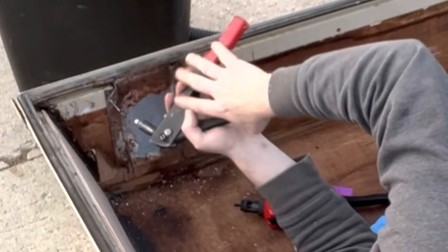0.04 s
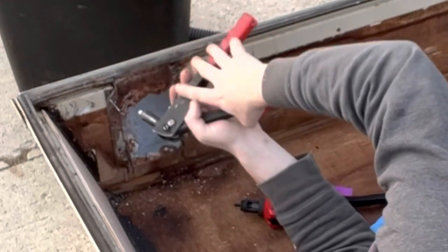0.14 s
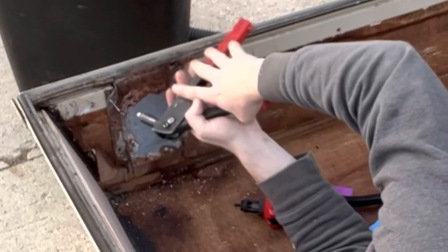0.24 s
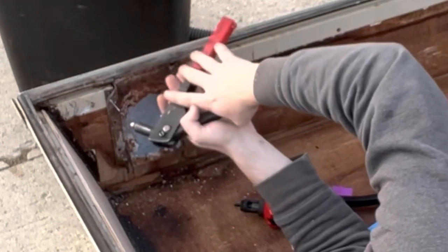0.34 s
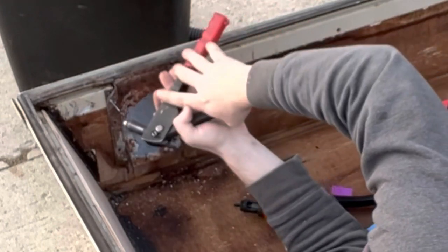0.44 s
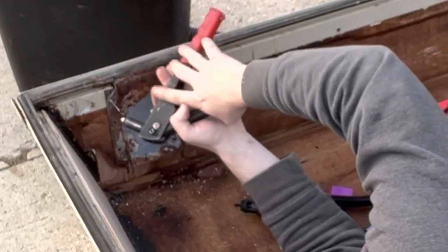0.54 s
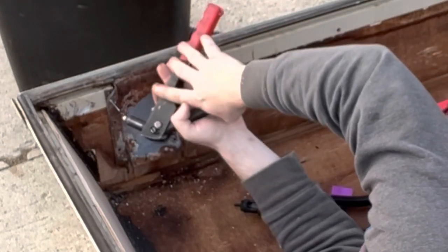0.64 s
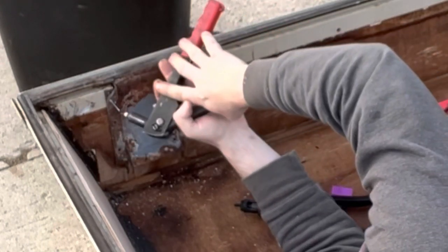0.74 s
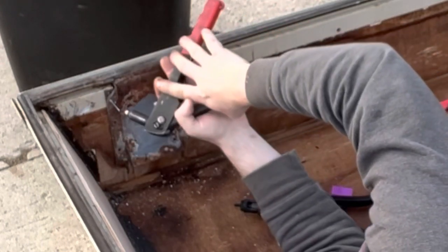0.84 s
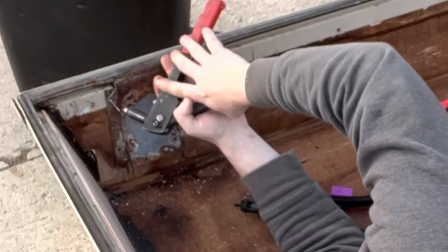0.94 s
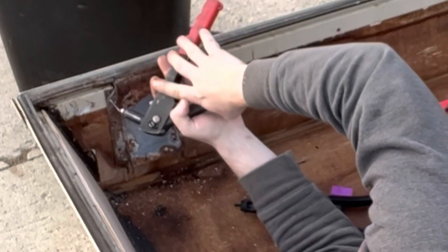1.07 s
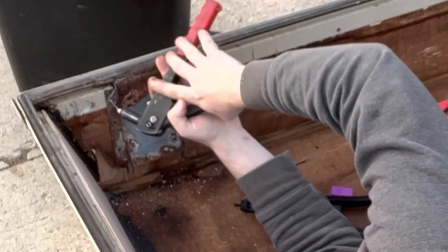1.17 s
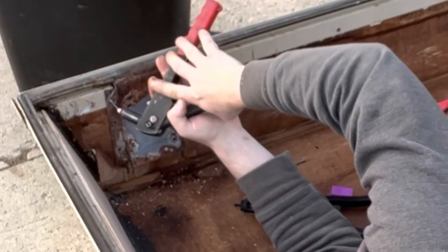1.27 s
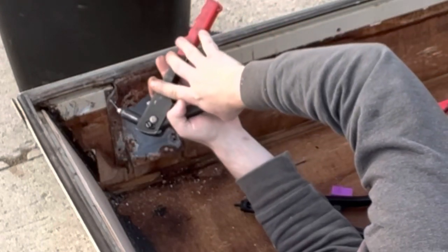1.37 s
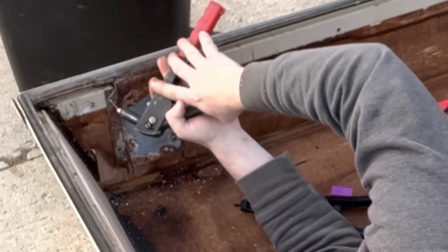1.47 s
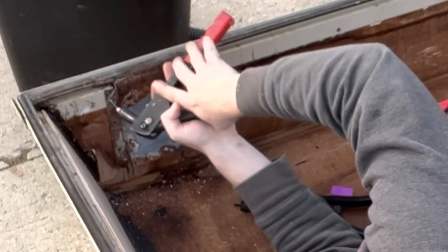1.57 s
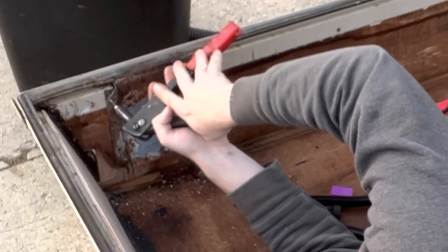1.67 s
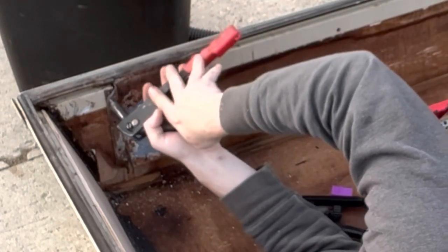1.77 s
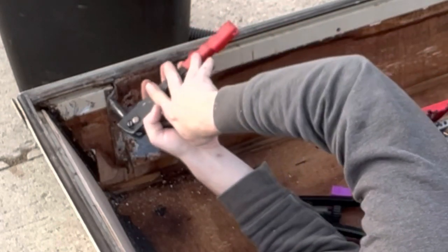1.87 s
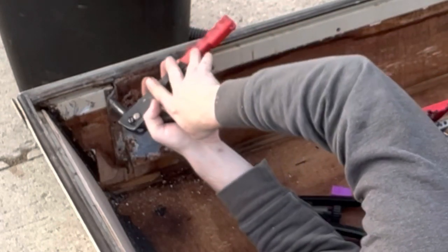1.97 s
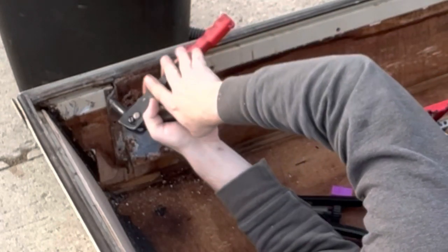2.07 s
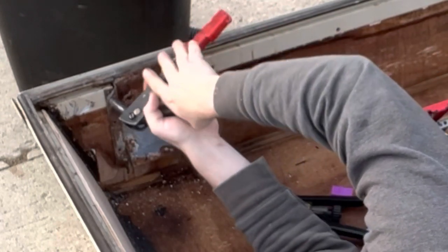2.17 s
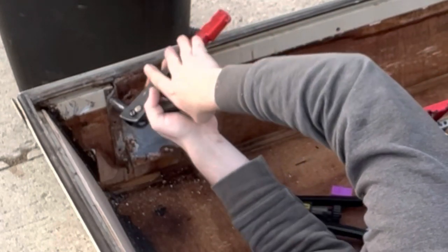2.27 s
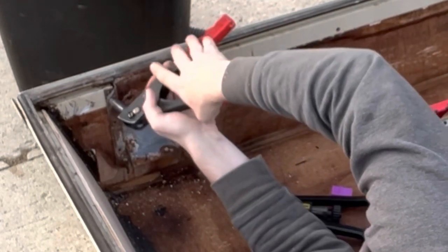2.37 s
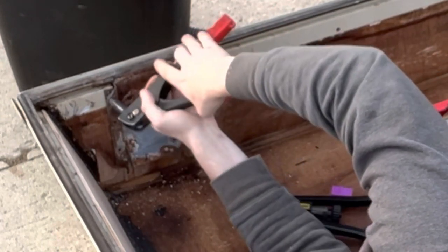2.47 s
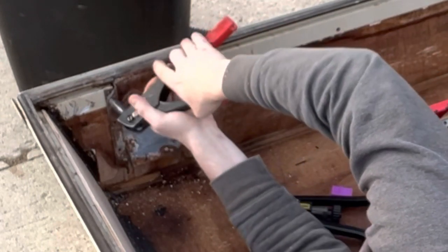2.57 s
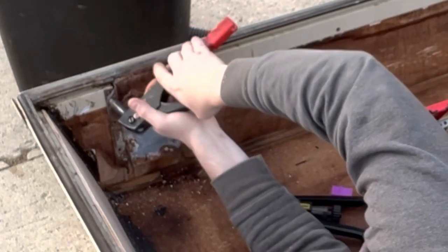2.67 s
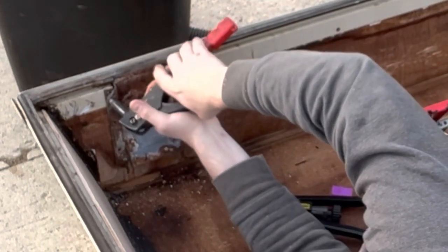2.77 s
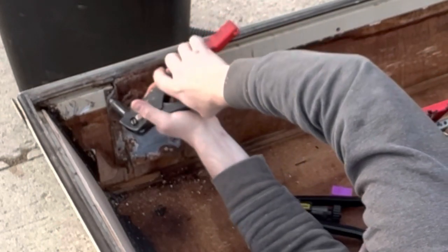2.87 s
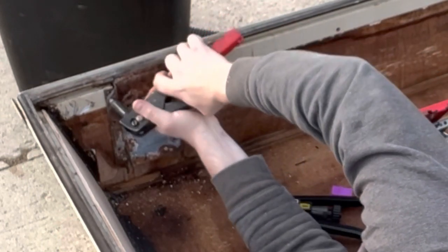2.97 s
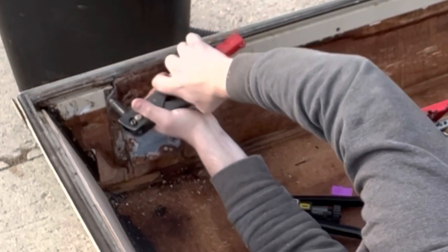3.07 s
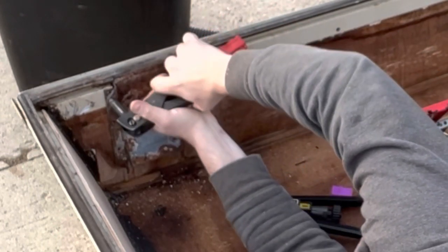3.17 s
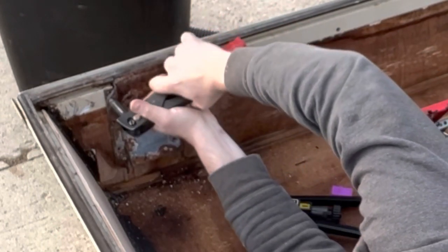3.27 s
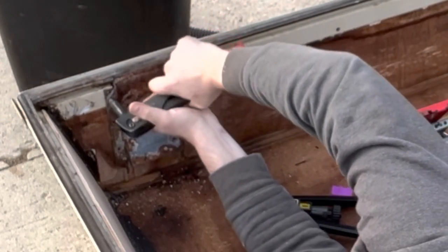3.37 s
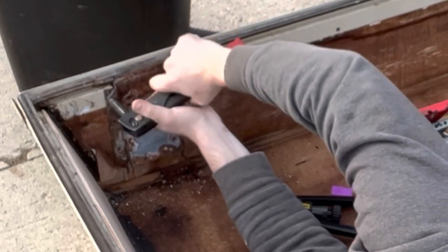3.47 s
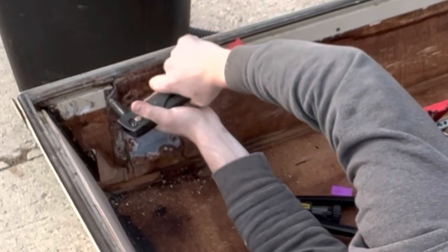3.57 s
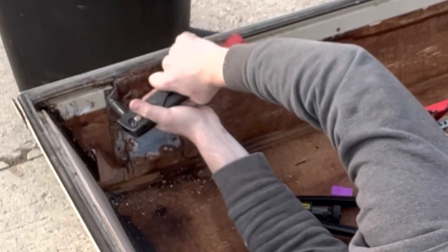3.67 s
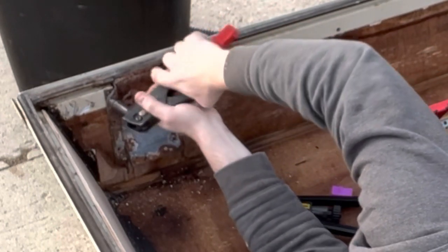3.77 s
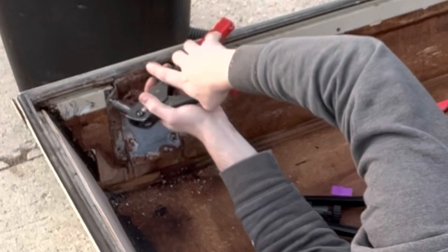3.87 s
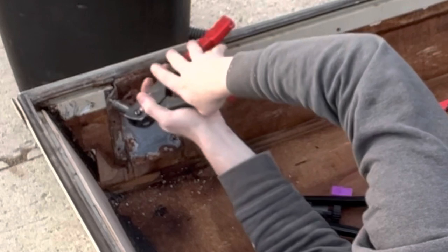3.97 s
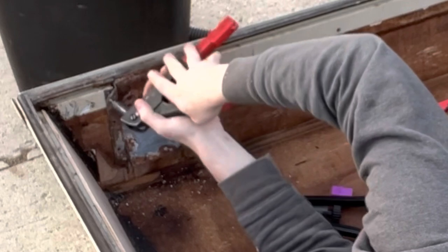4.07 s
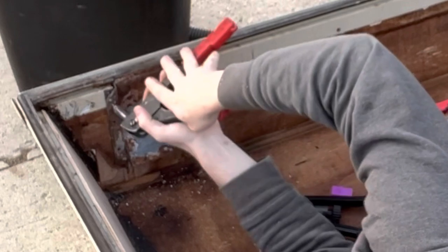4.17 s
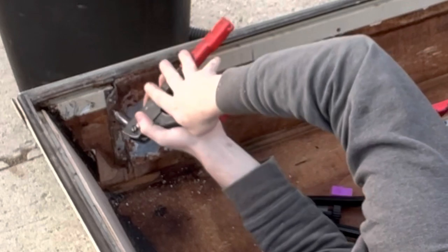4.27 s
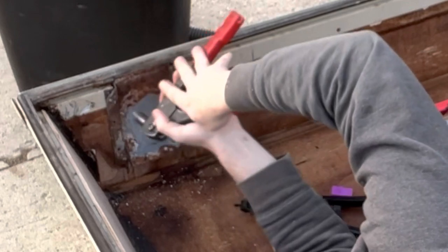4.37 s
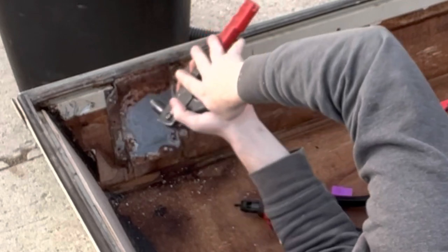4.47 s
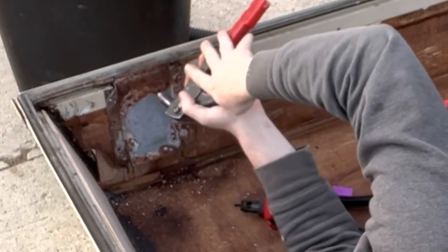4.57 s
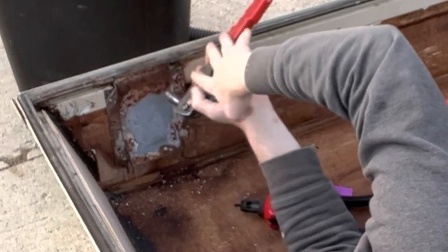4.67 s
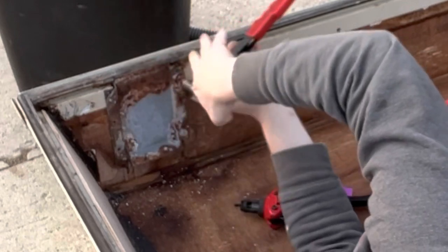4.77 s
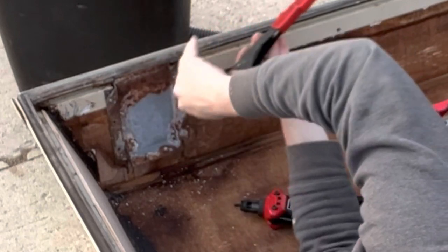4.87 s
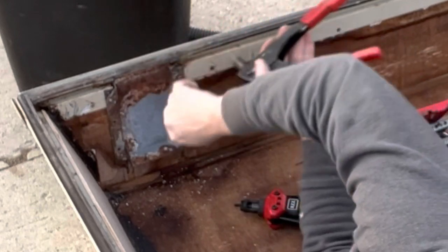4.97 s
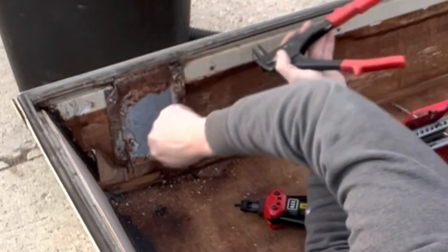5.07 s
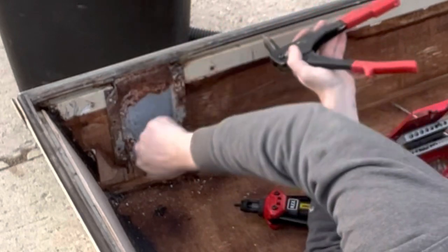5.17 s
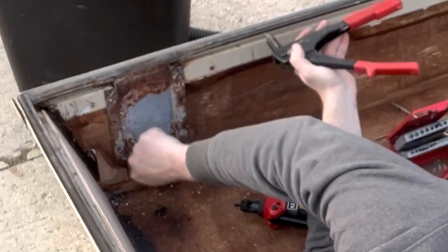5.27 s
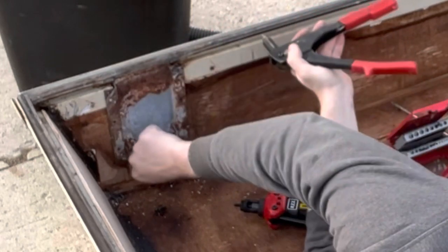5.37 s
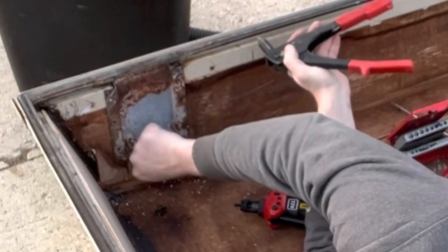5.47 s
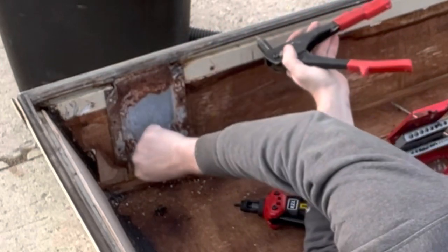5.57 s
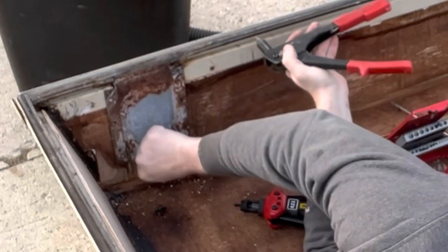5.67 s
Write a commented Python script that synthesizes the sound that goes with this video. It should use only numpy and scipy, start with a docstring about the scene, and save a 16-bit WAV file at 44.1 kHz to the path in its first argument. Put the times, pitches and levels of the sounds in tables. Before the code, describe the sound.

Faint clicks and sleeve rustle lead to one loud metallic snap as a hand riveter breaks the pin, then small rattles outdoors.

```python
"""Outdoors in a walled yard, a hand riveter sets a pop rivet in a steel patch on a wood-lined metal frame.
The mandrel breaks with a loud snap and the tool recoils onto the panel: decaying partials over dense noise.
Before and after, small contacts tick, grind, ping and rub, and a sleeve hisses as grained, fluttering noise.
Walls return smeared echoes and a dull tail; behind them lie traffic rumble, air hiss and one faint whistle."""
import sys
import numpy as np
from scipy import signal
from scipy.fft import rfft, irfft, next_fast_len
from scipy.io import wavfile
from scipy.ndimage import uniform_filter1d

SR = 44100
rng = np.random.default_rng(int(sys.argv[2]) if len(sys.argv) > 2 else 0)


def file_out(sig):
    """Save sig as 16-bit WAV at sys.argv[1]."""
    # one column per channel
    cols = np.atleast_2d(sig).T
    # limit, then scale
    lim = np.clip(cols, -1, 1)
    pcm = np.round(lim * 32767).astype(np.int16)
    wavfile.write(sys.argv[1], SR, pcm)


N = 252693
T = np.arange(N) / SR   # time in s

# the mandrel breaks, the jaws slam back and bounce twice:
# (t/s, level/dB, thud/dB, treble edge f/Hz, contact length/s)
SNAP = [(3.3722, -8, -16, 15900, 0.003), (3.3738, -10.5, -4.5, 5394, 0.0013),
        (3.3772, -17.5, 1.5, 9570, .003), (3.3885, -24, 1.5, 4000, 0.0024)]
# the tool lands on the panel with a low thud and rocks to rest:
# (t/s, level/dB, thud/dB, treble edge f/Hz, contact length/s)
LANDINGS = [(3.3885, -19.5, 8, 560, 0.018), (3.402, -25, 5.5, 260, 0.012), (3.422, -32.5, 5.5, 332, 0.008),
            (3.447, -34.5, 6, 393, 0.008)]
# the tool knocks against the plate as it is seated and as it rattles free:
# (t/s, level/dB, thud/dB, treble edge f/Hz, ping f/Hz, ping level/dB)
KNOCKS = [(1.177, -60, -10, 4700, 1420, -63), (1.184, -49, -2, 4650, 1400, -71),
          (1.188, -52.5, 6.5, 4600, 3440, -61), (1.198, -59, 14, 4740, 5160, -52),
          (1.203, -55.5, 4, 4670, 1400, -48), (1.829, -47, 7, 6500, 3060, -50.5),
          (1.8931, -50.5, 15.5, 1780, 403, -41.5), (2.040, -42, 7.5, 1900, 2310, -53),
          (3.7398, -55, 9.5, 6480, 1500, -59), (3.746, -56.5, 13, 2200, 991, -55.5),
          (3.7595, -41, 11, 5200, 4530, -43.5), (3.7715, -48, 11.5, 9100, 2940, -43),
          (3.780, -51, 8.5, 4200, 1010, -47), (3.8204, -45, 14, 4430, 395, -44.5),
          (3.844, -51, 6, 6340, 4100, -52), (3.868, -47.5, 11, 4400, 2900, -67),
          (3.910, -45, -2, 2840, 1430, -38.5), (3.955, -59, 5.5, 3470, 1448, -56.5),
          (3.969, -54, 12, 5000, 4160, -53.5), (3.981, -62.5, 20.5, 2000, 360, -52.5),
          (4.209, -56, -4, 2400, 2360, -67.5)]
KNOCK_S = 0.0035   # how long a knock stays in contact
# left-right likeness of near sound: (f/Hz, likeness 0-1)
NEAR_LIKENESS = [(250, 0.69), (1000, 0.76), (2000, 0.61), (10000, 0.75)]
# left-right likeness of distant sound: (f/Hz, likeness 0-1)
FAR_LIKENESS = [(60, 1), (250, 0.48), (800, 0.23), (2000, 0.17), (10000, 0.13)]
EDGE_ORDER = 3.5   # steepness of the treble and bass edges of a contact


def from_db(db):
    """Decibels to gain."""
    return 10 ** (np.asarray(db) / 20)


def rms_one(x):
    """Scale to an rms of one."""
    return x / np.sqrt(np.mean(x ** 2) + 1e-20)


def at_hz(points, hz):
    """Read a table on a log-frequency axis."""
    f, value = np.transpose(points)
    return np.interp(np.log(np.maximum(hz, 1)), np.log(f), value)


def noise(spectrum, likeness):
    """Stereo noise of a given colour and left-right likeness; rms 1."""
    size = next_fast_len(N)
    hz = np.arange(size // 2 + 1) * SR / size
    alike = np.clip(at_hz(likeness, hz), 0, 1)
    mid, side = rfft(rng.standard_normal((2, size)))
    pair = np.sqrt(1 + alike) * mid + np.sqrt(1 - alike) * side * [[1], [-1]]
    # the colour fades beyond both ends of its table
    bass_end = np.clip(hz / spectrum[0][0], 0, 1) ** 2
    treble_end = 1 / np.maximum(hz / spectrum[-1][0], 1) ** 4
    colour = bass_end * treble_end * from_db(at_hz(spectrum, hz))
    return rms_one(irfft(pair * colour, size)[:, :N])


def bands(x):
    """Split into third octaves: (centre Hz, band)."""
    edges = 56 * 2 ** (np.arange(26) / 3)
    for low, high in zip(edges, edges[1:]):
        sos = signal.butter(2, [low, high], "band", fs=SR, output="sos")
        yield np.sqrt(low * high), signal.sosfilt(sos, x)


def ring(clicks, hz, t60):
    """A two-pole resonator: a unit click sets a sine of height 1 ringing, which then dies."""
    r, w = from_db(-60 / (t60 * SR)), 2 * np.pi * hz / SR
    return signal.lfilter([0, np.sin(w)], [1, -2 * r * np.cos(w), r * r], clicks + 1e-18)


def linger(energy, t60):
    """Spread energy into a dying tail, keeping its total."""
    r = from_db(-60 / (t60 * SR)) ** 2
    return signal.lfilter([1 - r], [1, -r], energy + 1e-18)


def grained(sound, grain_db):
    """Tiny slips, a millisecond or two each, roughen a sound."""
    grain = rms_one(uniform_filter1d(rng.standard_normal(N), size=70))
    return rms_one(sound * from_db(grain_db * grain))


def strength(rows, hz):
    """How hard each contact drives a frequency: weight on the panel adds thud, a soft contact lacks treble."""
    s, level_db, thud_db, edge_hz, length = np.transpose(rows)
    thud_share = at_hz([(420, 0.94), (1100, 0.088)], hz)
    return from_db(level_db + thud_share * thud_db) / np.hypot(1, (hz / edge_hz) ** EDGE_ORDER)


def above(hz, edge_hz):
    """Steel striking steel is too light to move the panel: its bass falls away below an edge."""
    return 1 / np.hypot(1, (edge_hz / hz) ** EDGE_ORDER)


def partials(rows, column, vary_db, bass_hz):
    """Every contact starts the same dying partials, each with strengths of its own; slow scuffs hardly do."""
    # the pitched partials heard in the snap and the taps:
    # (f/Hz, level in slam and landing/dB, level in small contacts/dB, t60/s)
    partial_table = [(119, -13.5, -12, .18), (226, -10, -14, .12), (275, -10, -17, .1), (353, -2, -5, .085),
                     (406, -6, -8, .075), (452, -4, -8, .07), (514, -3.5, -7, .07), (573, -10, -12, .06),
                     (721, -1.5, -11, .085), (923, -4.5, -6, .06), (1022, -6.5, -2, .07),
                     (1231, -7, -11, .065), (1433, -4.5, -5, .055), (1535, -5, -8, .055),
                     (2020, -7, -12, .04), (2150, -8, -14, .04), (2470, -17, -16, .09),
                     (2900, -7, -3, .035), (3170, -5, -13, .03), (3560, -9, -9, .04), (4250, -7, -7, .04),
                     (4655, 0.5, -3, .04), (5420, -1, -9, .025), (5900, -3, -14, .02),
                     (7700, -1, -10, .025), (8950, 2, -8, .025)]
    at = [round(row[0] * SR) for row in rows]
    sharpness = 1 / np.hypot(1, np.array(rows)[:, -1] / 0.0076)   # falls with contact length in s
    chance = from_db(vary_db * rng.standard_normal((len(rows), len(partial_table))))
    out = np.zeros(N)
    for k, partial in enumerate(partial_table):
        hz, level_db, t60 = partial[0], partial[column], partial[-1]
        clicks = np.zeros(N)
        clicks[at] = strength(rows, hz) * sharpness * chance[:, k]
        sign = (-1) ** k   # neighbouring partials start in opposite directions
        out += sign * from_db(level_db) * above(hz, bass_hz) * ring(clicks, hz, t60)
    return out


def pitched_hits(small):
    """The slam starts the higher partials, the landing the low ones, small contacts a little of each."""
    slam = from_db(-3.0) * partials([SNAP[1]], column=1, vary_db=0.37, bass_hz=470)
    landing = from_db(4.5) * partials(LANDINGS[:1], column=1, vary_db=0.86, bass_hz=60)
    taps = from_db(-4.5) * partials(small, column=2, vary_db=4.0, bass_hz=60)
    return slam + landing + taps


def stored_energy(rows, hz, build_cycles):
    """Dense ringing near hz is fed by a contact, then dies; the bass and slow scuffs take longest to build."""
    # how long the dense ringing lasts: (f/Hz, t60/s)
    dense_t60 = [(100, .14), (400, .065), (1200, .052), (3500, .036), (12000, .028)]
    energy, age, t60 = np.zeros(N), T[:SR // 5], at_hz(dense_t60, hz)
    for (s, *_, length), gain in zip(rows, strength(rows, hz)):
        build = 1 - np.exp(-(age / (build_cycles / hz + length / 8)) ** 2)
        decay = np.exp(-np.log(1000) * np.maximum(age - length / 2, 0) / t60)
        shape = build * decay
        start = round(s * SR)
        energy[start:start + len(age)] += (gain * shape[:N - start]) ** 2
    return energy


def clatter(small):
    """The dense ringing of snap, landings and small contacts, heard directly and by way of the yard."""
    # colour of the dense, short-lived ringing between the partials: (f/Hz, level per Hz/dB)
    colour = [(70, -17), (150, 10), (450, 10.5), (1000, 0.5), (1480, 0.5), (1750, -4.5), (2150, 0),
              (2600, -3), (3100, 0.5), (3800, -1), (4700, -1.5), (5900, -6.5), (8800, -4), (12500, -9),
              (16000, -10)]
    # how strongly snap and landings feed it: (f/Hz, level/dB)
    snap_feed = [(130, 8), (260, 1.5), (420, 0.5), (750, 0.5), (1400, 3), (3000, 5.5), (7000, 5.5)]
    snap_bass_hz = 307.4   # the snap itself falls away below this
    direct, echoes = 0, 0
    grit = grained(np.ones(N), grain_db=2.0)
    near_bands, far_bands = bands(noise(colour, NEAR_LIKENESS)), bands(noise(colour, FAR_LIKENESS))
    for (hz, near), (_, far) in zip(near_bands, far_bands):
        crack = above(hz, snap_bass_hz) ** 2 * stored_energy(SNAP, hz, build_cycles=0.21)
        landing = stored_energy(LANDINGS, hz, build_cycles=0.45)
        snap = from_db(at_hz(snap_feed, hz)) ** 2 * (crack + landing)
        taps = (from_db(6.5) * grit) ** 2 * stored_energy(small, hz, build_cycles=0.58)
        direct += np.sqrt(snap + taps) * near
        echoes += np.sqrt(yard(snap + taps, hz, tail_db=-14.5)) * far
    return direct, echoes


def small_contacts():
    """Knocks and grinds with their bumps, chatter and slips, as rows laid out like SNAP."""
    # the jaws grind along the mandrel, the nose drags free, a hand scuffs the patch:
    # (t/s, level/dB, length/s, treble edge f/Hz)
    grinds = [(1.211, -52.5, 0.11, 220), (1.22, -66, 0.0087, 4600), (1.641, -56.5, 0.1, 1110),
              (1.786, -54.5, 0.05, 3300), (1.918, -57.5, 0.13, 1620), (2.006, -56, 0.12, 1600),
              (2.294, -64.5, 0.13, 990), (3.783, -62, 0.16, 4190), (5.262, -73, 0.041, 2200),
              (5.444, -76, 0.06, 3600)]
    # after each contact the panel settles with a duller bump
    settle_s, settle_db, settle_edge_hz = 0.017, -3.5, 290
    # after a knock the loose jaws touch once more, at some moment within this time
    chatter_s, chatter_db = 0.009, -11.5
    grind_thud_db, grind_settle_db = 5, -5
    # a grind catches and slips a few times, within this share of its length
    slip_db, slip_span = -3.5, 0.64
    rows = []
    for (s, db, thud_db, edge_hz, *_), share in zip(KNOCKS, rng.random(len(KNOCKS))):
        rows += [(s, db, thud_db, edge_hz, KNOCK_S),
                 (s + settle_s, db + settle_db, thud_db, settle_edge_hz, KNOCK_S),
                 (s + share * chatter_s, db + chatter_db, thud_db, edge_hz, KNOCK_S)]
    for (s, db, length, edge_hz), shares in zip(grinds, rng.random(size=(len(grinds), 4))):
        rows += [(s, db, grind_thud_db, edge_hz, length),
                 (s + settle_s, db + grind_settle_db, grind_thud_db, settle_edge_hz, length)]
        for share in shares:
            slip_at = s + share * slip_span * length
            rows.append((slip_at, db + slip_db, grind_thud_db, edge_hz, KNOCK_S))
    return rows


def pings():
    """Each knock lands on another part, which rings out with a note of its own."""
    # how long a ping lasts: (f/Hz, t60/s)
    ping_t60 = [(400, 0.069), (1400, 0.022), (2400, 0.089), (3000, 0.052), (4500, 0.028)]
    out = np.zeros(N)
    for s, *_, hz, level_db in KNOCKS:
        age = np.maximum(T - s - KNOCK_S / 2, 0)
        decay = from_db(level_db - 60 * age / at_hz(ping_t60, hz))
        out += decay * np.sin(2 * np.pi * hz * age)
    return out


def ticks():
    """Tiny steel-on-steel ticks of the lever: a bright noise burst that dies at once."""
    # (t/s, level/dB)
    tick_times = [(0.494, -63.5), (1.020, -65), (1.064, -67.5), (1.762, -62), (1.830, -54.5), (1.954, -65),
                  (2.869, -58), (3.757, -54), (3.771, -51.5), (3.966, -60), (4.086, -67.5), (4.2, -65.5)]
    # (f/Hz, level per Hz/dB)
    tick_colour = [(1000, -8), (5000, 1.5), (9000, 3), (12000, -8), (14000, 3), (16000, 0)]
    t60_s = 0.033
    bursts = sum(from_db(db - 60 * np.maximum(T - s, 0) / t60_s) * (T >= s) for s, db in tick_times)
    return bursts * noise(tick_colour, NEAR_LIKENESS)


def stroke(start, length, level_db, attack, release):
    """A sliding motion speeds up, runs evenly and slows to rest; its hiss grows as a power of the speed."""
    speed = np.clip(np.minimum((T - start) / attack, (start + length - T) / release), 0, 1)
    return from_db(level_db) * speed ** 2.3


def rubs():
    """The loose tool slides lightly on steel: friction noise sings in a few narrow resonances."""
    # (start t/s, length/s, level/dB)
    slides = [(4.078, 0.08, -76.5), (5.44, 0.076, -85)]
    # what the rubbed steel sings at: (f/Hz, level/dB)
    resonances = [(1450, 1.5), (2150, -9), (3560, 0), (3900, -10), (8400, -6)]
    t60_s = 0.024
    force = sum(stroke(s, length, db, attack=0.0047, release=0.062) for s, length, db in slides)
    friction = force * rng.standard_normal(N)
    singing = sum(from_db(db) * ring(friction, hz, t60_s) for hz, db in resonances)
    return singing / np.sqrt(t60_s * SR / np.log(1e12))   # undo the resonators' gain on noise


def sleeve():
    """Fibres catch and slip under each stroke: a finely grained hiss that flutters as the folds pass."""
    # the sleeve slides as the arm moves: (start t/s, length/s, level/dB, attack/s, release/s)
    strokes = [(0.375, 0.2, -83.5, 0.1, 0.029), (1.68, 0.16, -59.5, 0.22, 0.019),
               (1.836, 0.27, -75, 0.011, 0.15), (2.113, 0.13, -65.5, 0.077, 0.016),
               (2.224, 0.14, -59.5, 0.017, 0.1), (2.317, 0.24, -66, 0.078, 0.1),
               (2.859, 0.21, -65, 0.022, 0.078), (3.071, 0.25, -64.5, 0.062, 0.077),
               (3.267, 0.21, -64, 0.034, 0.12), (3.43, 0.13, -69, 0.03, 0.09),
               (3.723, 0.341, -66.5, 0.022, 0.197), (4.076, 0.32, -74, 0.0058, 0.3),
               (4.263, 0.22, -72, 0.065, 0.057), (4.67, 0.13, -87.5, 0.036, 0.068),
               (5.44, 0.08, -81, 0.041, 0.032)]
    # colour of the cloth: (f/Hz, level per Hz/dB)
    cloth = [(300, 4.5), (700, 3.5), (1200, 2), (1900, 5), (3100, -5), (4500, 0), (6500, -3.5), (8300, -2),
             (10300, -4.5), (11600, -14.5), (13000, -7.5), (15000, -25.5)]
    folds_hz, folds_db = 21.97, 1.8   # rate and rms depth of the flutter
    pressure = sum(stroke(*row) for row in strokes)
    folds = rms_one(ring(rng.standard_normal(N), folds_hz, 0.046))
    hiss = grained(noise(cloth, NEAR_LIKENESS), grain_db=1.0)
    return from_db(5.0 + folds_db * folds) * pressure * hiss


def ports(pair):
    """Sound from the work bends round the microphone housing and reaches the right port later."""
    # how far the right port lags the left: (f/Hz, phase/rad)
    port_phase = [(0, 0.43), (1000, 0.04), (2300, 1), (4600, 1.8), (6300, 4.1), (8400, 5.7), (11400, 6),
                  (13200, 10.5), (16000, 9.3)]
    size = next_fast_len(N + 1000)
    hz = np.arange(size // 2 + 1) * SR / size
    late = np.exp(-1j * np.interp(hz, *np.transpose(port_phase)))
    right = irfft(rfft(pair[1], size) * late, size)[:N]
    return np.array([pair[0], right])


def yard(energy, hz, tail_db):
    """Energy that comes back: a thin, dull tail, and one smeared echo from each wall."""
    # walls around the yard: (delay/s, smear t60/s, level/dB, treble edge f/Hz)
    walls = [(0.04, 0.073, -18.5, 9500), (0.109, 0.324, -32.5, 6000)]
    # the yard's tail: (f/Hz, t60/s)
    tail_t60 = [(150, 0.79), (1000, 0.65), (4000, 0.21), (9000, 0.37), (15000, .11)]
    tail_edge_hz = 4500   # the tail is dull above this
    tail = linger(energy, at_hz(tail_t60, hz))
    back = from_db(tail_db) ** 2 * tail / (1 + (hz / tail_edge_hz) ** 2)
    for delay, t60, level_db, edge_hz in walls:
        arriving = np.roll(energy, round(delay * SR))
        scattered = linger(linger(arriving, t60), t60)
        back += from_db(level_db) ** 2 * scattered / (1 + (hz / edge_hz) ** 4)
    return back


def far_whistle(s, length, hz, level_db):
    """One faint, narrow whistle swells and fades: noise through a resonator under a bell-shaped envelope."""
    tone = rms_one(ring(rng.standard_normal(N), hz, 0.04))
    return from_db(level_db) * tone * np.exp(-((T - s) / length) ** 2)


def traffic():
    """Distant traffic is a steady, bass-heavy noise, a little weaker on the right."""
    # (f/Hz, level per Hz/dB)
    rumble_colour = [(13, -63), (22, -33), (50, -3.5), (80, 1), (124, -3.5), (146, -9.5), (177, -12.5),
                     (306, -25.5), (346, -23), (476, -29), (520, -21.5), (558, -28), (794, -27.5),
                     (1260, -47), (1500, -58.5), (1950, -82), (3300, -120)]
    return from_db(-48.5) * noise(rumble_colour, FAR_LIKENESS) * from_db([[0], [-1.3]])


def open_air():
    """The open air is a faint, steady, wide hiss."""
    # (f/Hz, level per Hz/dB)
    air_colour = [(700, -6), (1500, 5), (2500, -1), (4500, -3), (6500, -6.5), (9500, -4), (12000, -10.5),
                  (14000, -17)]
    return from_db(-84.5) * noise(air_colour, FAR_LIKENESS)


def scene():
    """Riveter and sleeve close by, the yard and the open air around them."""
    small = small_contacts()
    contacts, echoes = clatter(small)
    work = ports(contacts + pitched_hits(small) + pings() + rubs() + ticks() + sleeve())
    whistle = far_whistle(s=4.74, length=0.064, hz=1574, level_db=-81)
    return work + echoes + traffic() + open_air() + whistle


def record(dry):
    """The loudest peaks are rounded and the top is cut."""
    rounded = 1.067 * np.tanh(dry / 1.023)
    top_cut = signal.ellip(10, .2, 80, 16200, fs=SR, output="sos")   # low-pass at 16200 Hz
    return signal.sosfilt(top_cut, rounded)


dry = scene()
out = record(dry)
file_out(out)
```